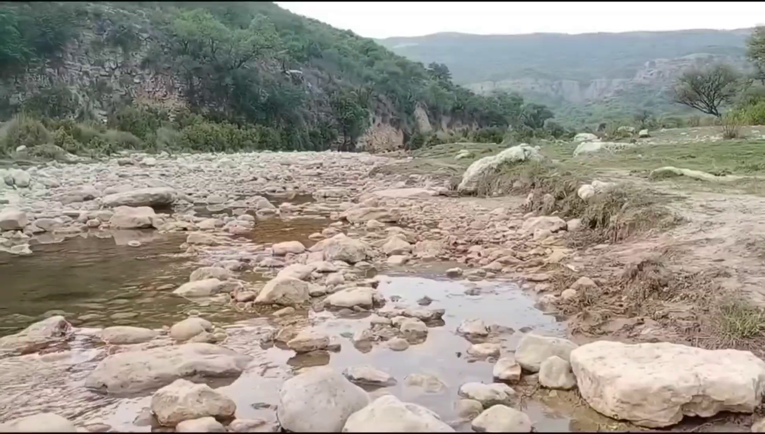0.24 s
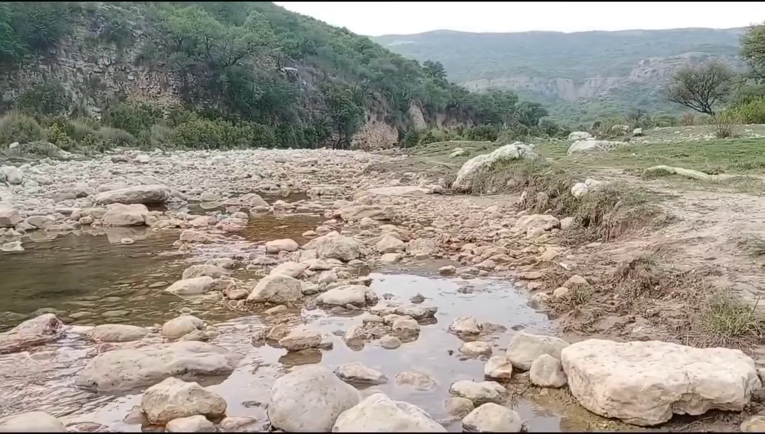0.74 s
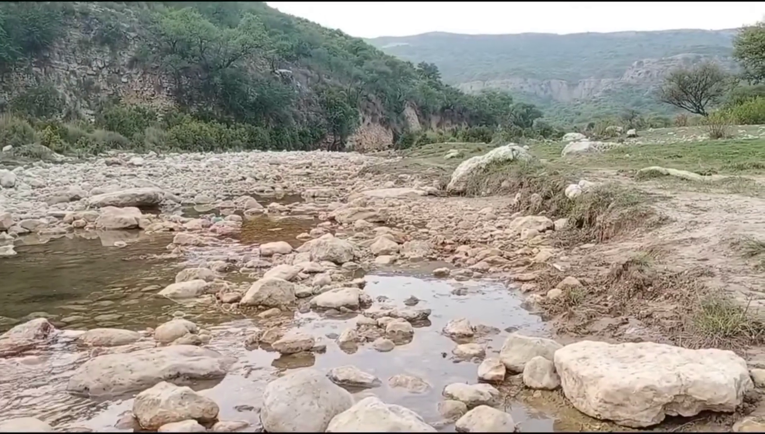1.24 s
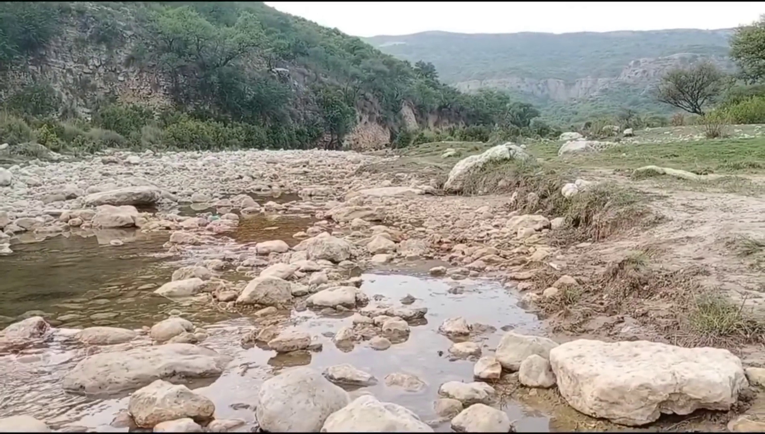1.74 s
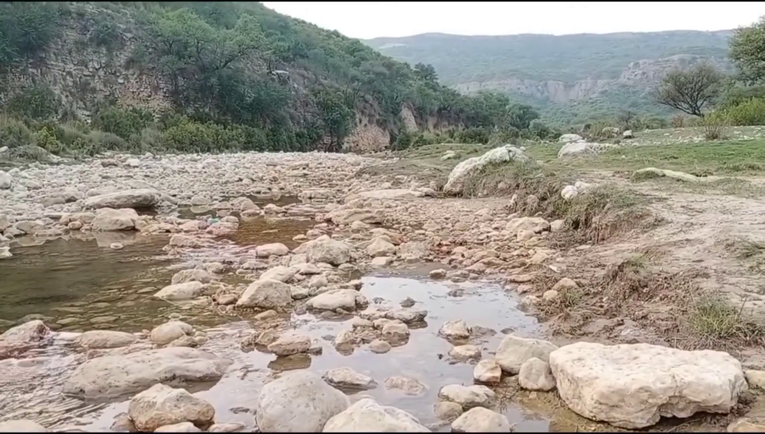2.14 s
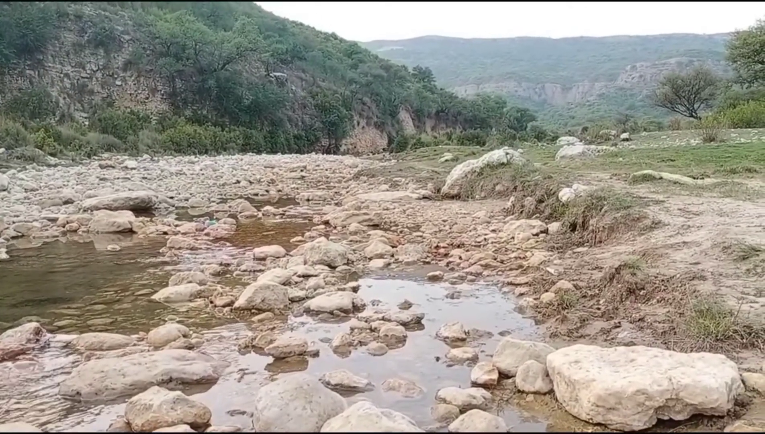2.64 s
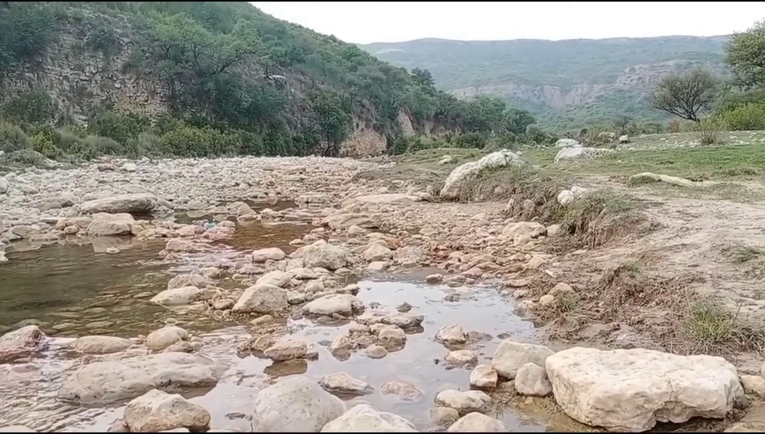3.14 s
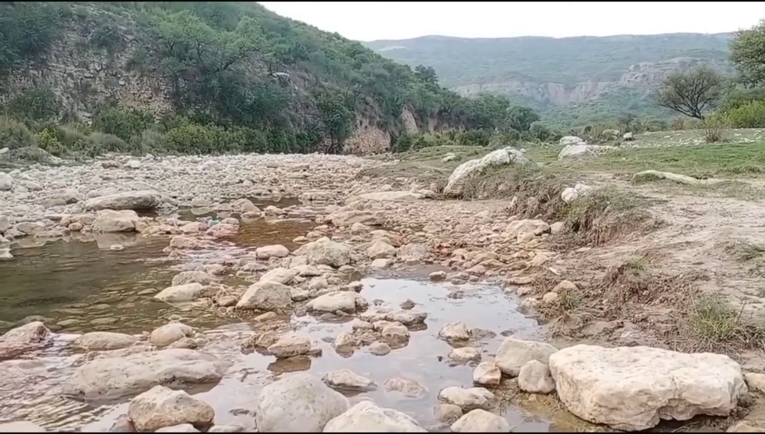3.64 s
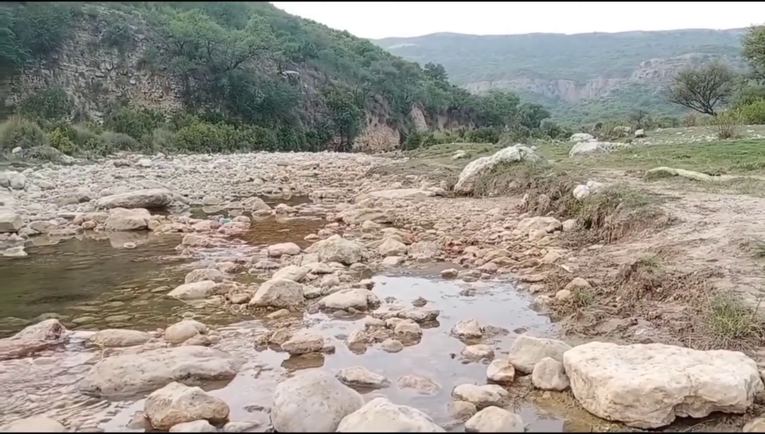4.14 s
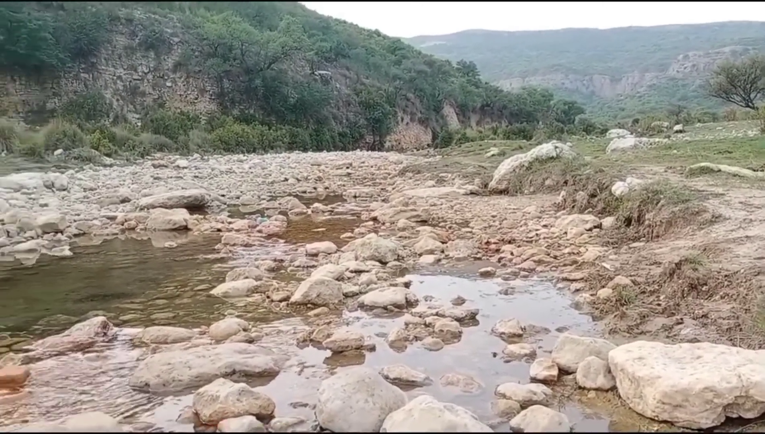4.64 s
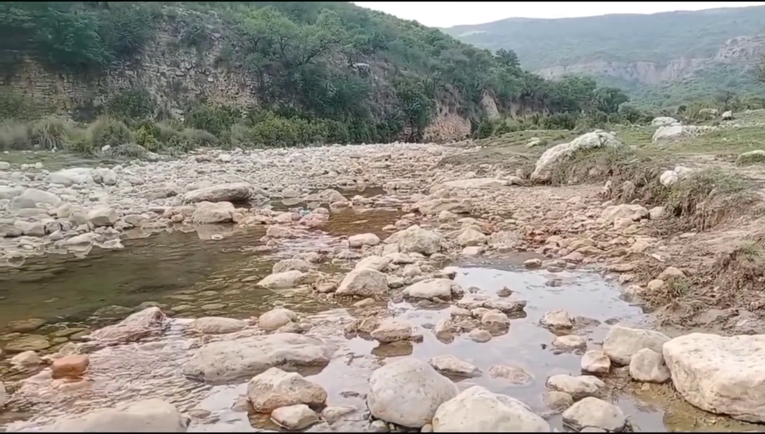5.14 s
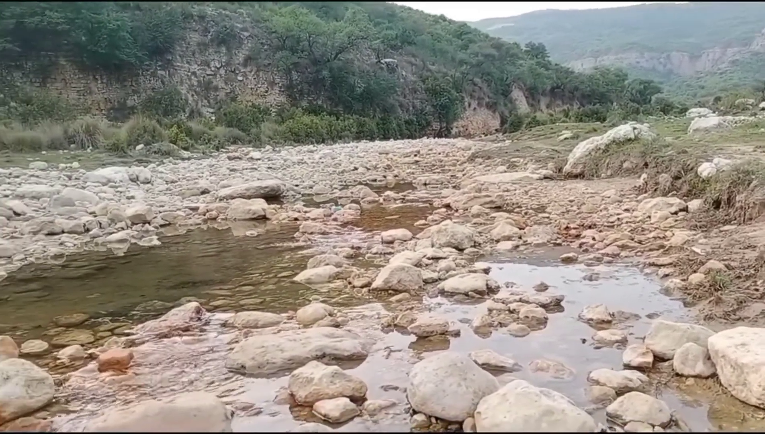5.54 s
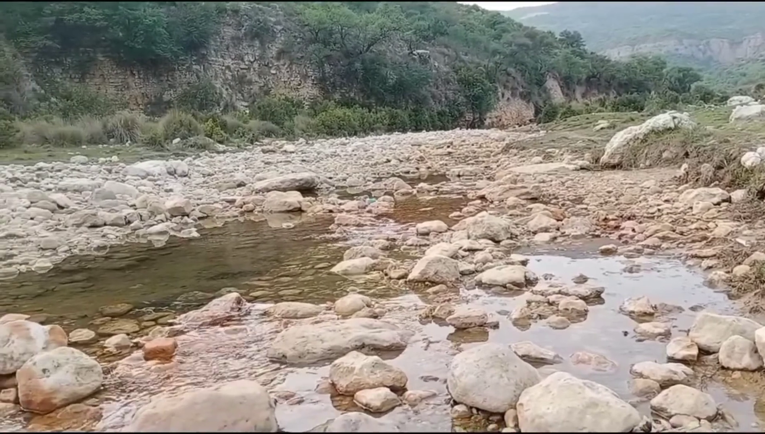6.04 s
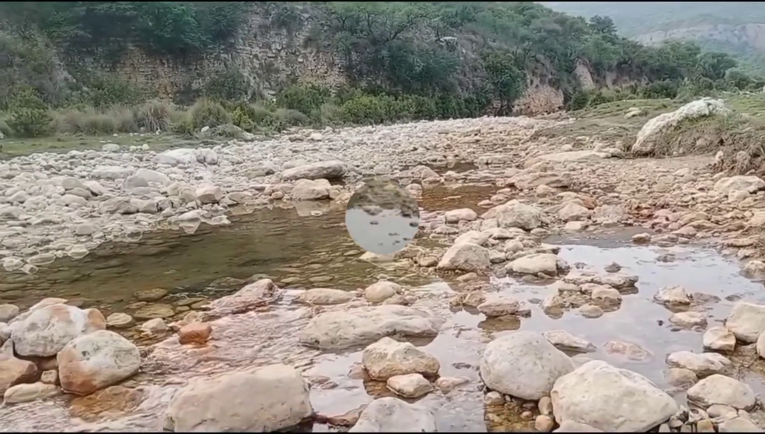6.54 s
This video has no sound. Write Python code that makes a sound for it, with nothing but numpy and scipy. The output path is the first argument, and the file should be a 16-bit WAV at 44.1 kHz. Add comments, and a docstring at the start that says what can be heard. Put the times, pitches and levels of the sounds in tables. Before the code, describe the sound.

A brief, bright rush of stream water with a short thin bird call breaks off abruptly. A quieter brook then fades in close by, gurgling over stones with ringing plops, wet slaps and, later, hollow low gulps. Faint birds whistle across an open valley. Near the end a pebble knocks, birds chirp in a quick run, wind buffets the microphone and a small motorcycle putters nearer.

```python
"""A lively burst of stream water over stones comes first, with a short thin bird call; it breaks off at 0.3 s.
Calmer water fades in: ringing gurgle, plops, splashes and hollow gulps, with small birds whistling far away.
Near the end a small motorcycle putters closer, wind buffets the microphone and a pebble knocks.
Bubbles, gulps and birds are sine tones; rushing water, wind and hiss are shaped noise; the motor is a row of puffs."""
import sys
import numpy as np
from scipy import signal
from scipy.fft import rfft, irfft, next_fast_len
from scipy.io import wavfile
from scipy.ndimage import uniform_filter1d, map_coordinates

SR = 44100
rng = np.random.default_rng(int(sys.argv[2]) if len(sys.argv) > 2 else 0)


def materialize(psi):
    """Save the field psi as 16-bit PCM at rate SR to the path in sys.argv[1].

    A 1-D psi becomes a single channel; in a 2-D psi each row is a channel.
    """
    bounded = np.clip(np.atleast_2d(psi).T, -1, 1)
    quanta = np.round(bounded * 32767).astype(np.int16)
    wavfile.write(sys.argv[1], SR, quanta)


N = 298998

# All dB values are relative: each sound's own gain and the overall level still act on them.
# A t60 is the time a sound takes to die away by 60 dB.

# Overall level around the break. Each row: time in seconds, level in dB.
OVERALL_LEVEL = [(.3035, -3.5), (.305, -20), (.335, -23), (.38, -14)]

# Flow of the lively opening riffle, then of the calmer brook.
# Each row: time in seconds, gurgle in dB, fizz in dB, spray in dB.
RIFFLE_FLOW = [(0, -56.5, -68.5, -92), (.11, -61, -66, -82), (.2, -55, -59, -82), (.3, -57.5, -62, -76)]
BROOK_FLOW = [(0.36, -73.5, -96, -100), (0.48, -65.5, -77.5, -100), (0.72, -55, -79, -88),
              (1.27, -56.5, -71, -90), (1.47, -49.5, -66, -78), (1.84, -55, -66, -83),
              (2.08, -50.5, -57.5, -67), (2.49, -57.5, -65.5, -80.5), (2.76, -57.5, -69, -75),
              (3, -52.5, -65.5, -83.5), (3.28, -58.5, -68, -87), (3.44, -47.5, -51.5, -60.5),
              (3.66, -47.5, -55, -65.5), (3.95, -55.5, -67, -78), (4.19, -57, -73.5, -86.5),
              (5.2, -57, -72, -81.5), (5.69, -51.5, -64.5, -83), (6.49, -59, -72.5, -82),
              (6.78, -55.5, -68, -99)]

# Tone colours of the water, from its ringing middle to its low murmur.
# Each row: frequency in Hz, strength per Hz in dB.
GURGLE_COLOUR = [(600, -24.5), (950, -11), (1150, -16.5), (1480, -3.5), (1700, -5.5), (2250, -1.5),
                 (3200, -2), (4400, -9), (5200, -27.5), (6500, -69)]
FIZZ_COLOUR = [(3500, -44.5), (4400, -16), (4750, -5), (5100, -11.5), (5800, 1.5), (6500, -1),
               (7200, -18.5), (7800, -14), (9000, -47)]
SPRAY_COLOUR = [(6500, -27), (8000, -7.5), (9500, -14), (11300, -9.5), (12600, -2), (15800, -3.5)]
MURMUR_COLOUR = [(30, -16.5), (75, -2), (300, -5), (700, -9), (1100, -16), (2000, -33)]

# Thin rings above the water. Each row: pitch in Hz, width in Hz, level over the gurgle in dB.
HIGH_RINGS = [(4725, 180, -11.5), (6500, 340, -11)]

# Wavelets that wash over the stones and churn in a hollow. Each row: time of the height in seconds,
# length in seconds, pitch of the hollow in Hz, churn level in dB, lift of the hiss in dB.
WAVELETS = [(0.857, 0.086, 2380, -41.5, 2.5), (1.223, .08, 2960, -41, 6), (0.978, .09, 2710, -45.5, 0),
            (1.605, 0.14, 2225, -41, 12), (1.67, .16, 748, -54, 1), (1.851, 0.16, 2205, -40.5, 10.5),
            (1.921, 0.064, 3300, -37, 12.5), (2.08, 0.18, 1950, -52, 7), (2.249, 0.1, 1435, -53, 6),
            (2.422, 0.093, 2260, -45, 4), (2.668, .12, 2130, -38, 2.5), (3.189, 0.11, 2187, -46, 13),
            (3.473, 0.34, 2360, -45, 3), (3.649, 0.16, 1696, -41.5, 2), (3.923, .13, 1923, -44.5, 8.5),
            (4.097, 0.086, 3330, -40.5, 0.5), (4.261, 0.071, 2990, -45.5, 7.5),
            (5.65, 0.17, 1427, -50, 5.5), (5.994, 0.13, 1252, -48, 10), (6.391, 0.13, 1467, -41, -0.5)]

# Wind. Each row of the first: time in seconds, level in dB; of the second: frequency in Hz, strength in dB.
WIND_LEVEL = [(0, -97), (.08, -79), (.11, -52), (.3, -57.5), (.35, -110), (5.9, -91.5), (6.35, -53.5),
              (6.54, -36), (6.78, -42)]
WIND_COLOUR = [(8, -6.0), (28, -10.0), (60, -10.5), (130, -10.5), (300, -37.5)]

# The largest bubbles. Each row: start in seconds, pitch in Hz, peak in dB.
LARGE_PLOPS = [(.119, 2754, -40.5), (.177, 1450, -41.5), (.379, 1420, -48.5), (.698, 1504, -38.5),
               (.792, 1211, -33.5), (.852, 3020, -40.5), (.9, 1506, -44.5), (1.075, 1604, -42),
               (1.282, 2950, -42.5), (1.612, 1456, -36), (1.706, 2255, -36.5), (1.708, 1510, -38),
               (2.153, 2170, -38), (2.587, 1616, -38.5), (2.6, 2535, -36), (2.703, 563, -36),
               (2.708, 1390, -32.5), (2.741, 2500, -34.5), (2.812, 2880, -40), (2.93, 1395, -44),
               (3.333, 1568, -35), (3.665, 1315, -39), (3.751, 1092, -37), (3.757, 766, -39.5),
               (4.08, 1226, -34.5), (4.233, 2380, -43.5), (4.631, 2756, -37), (4.732, 1500, -37.5),
               (4.747, 822, -49.5), (4.891, 1510, -45), (5.097, 4020, -42.5), (5.26, 406, -47),
               (5.33, 887, -45.5), (5.376, 1830, -44), (5.393, 1690, -49), (5.483, 1990, -40.5),
               (5.512, 1400, -41.5), (5.514, 635, -48), (5.654, 1424, -43.5), (5.721, 2770, -40),
               (5.755, 1555, -40.5), (6.188, 1665, -41), (6.39, 883, -48.5), (6.76, 1450, -33)]

# The first bird call. Each row: time in seconds, pitch in Hz, level in dB.
BIRD_CALL = [(.13, 3860, -63), (.185, 3790, -44), (.213, 3780, -40.5), (.25, 3944, -43),
             (.304, 3906, -44.5), (.32, 3925, -75)]

# Thin bird whistles. Each row: start in seconds, length in seconds, start pitch in Hz, end pitch in Hz,
# peak in dB, waver as a share of the pitch.
BIRD_WHISTLES = [(4.41, 0.15, 2940, 2817, -49, 0.0033), (4.838, 0.12, 3480, 3397, -43, .003),
                 (5.19, 0.17, 2910, 2948, -43.5, 0.002)]

# Slaps of water on stone. Each row: start in seconds, level in dB, hold in seconds, t60 in seconds.
SPLASHES = [(0.1786, -31.5, 0.0061, 0.014), (0.54, -49, 0.014, 0.057), (1.798, -43.5, 0.0048, 0.045),
            (2.5986, -31, 0.0086, .05), (2.7007, -17.5, 0.0079, 0.069), (2.738, -34.5, 0.0054, 0.093),
            (3.741, -26, 0.019, 0.027), (4.074, -44.5, 0.017, 0.096), (4.734, -41, 0.011, .047),
            (5.763, -45, 0.0047, 0.04), (6.127, -43.5, .004, 0.083), (6.759, -37.5, 0.006, 0.067)]
# Tone colour of a splash. Each row: frequency in Hz, strength in dB.
SPLASH_COLOUR = [(300, -10.0), (900, -10), (1350, -7.5), (3800, -5.5),
                 (4900, -8.5), (6200, -5.5), (8500, -34), (15500, -38)]
# Resonances of the gap between the stones. Each row: pitch in Hz, width in Hz, level in dB.
STONE_GAP = [(1370, 144, -1.5), (1780, 70, 1), (2420, 170, -6), (3810, 120, -2), (6280, 180, -14)]

# Runnels that sing a gliding note. Each row: time of the height in seconds, length in seconds,
# start pitch in Hz, end pitch in Hz, level in dB.
RUNNELS = [(1.811, 0.073, 1206, 1900, -43), (2.398, 0.18, 1444, 1340, -40.5),
           (4.021, 0.1, 1950, 1760, -35.5), (6.214, 0.15, 2240, 2000, -45), (6.401, 0.1, 2620, 2150, -43)]

# Hollow gulps between the stones. Each row: start in seconds, pitch in Hz, peak in dB,
# swell in seconds, t60 in seconds, gargle in dB over the gulp.
GULPS = [(1.955, 223, -58, 0.0031, 0.2, 8.5), (2.604, 259.4, -35, 0.0048, 0.26, -13.5),
         (2.704, 263, -35.5, 0.0081, 0.25, -5.5), (3.529, 258.8, -49.5, 0.037, 0.7, -42),
         (3.75, 255.2, -36, 0.008, 0.2, -3.5), (5.258, 210, -51, 0.017, 0.53, 5.5),
         (5.32, 227, -38.5, 0.0085, 0.17, -13), (5.508, 229.5, -36, 0.0093, 0.29, -6.5),
         (5.604, 229.7, -39, 0.021, 0.68, -19), (5.73, 234.2, -32, 0.034, 0.19, -5.5),
         (6.039, 262, -31, 0.026, 0.18, -37), (6.205, 262, -27.5, 0.011, 0.069, -23.5),
         (6.228, 156, -46.5, 0.0033, 0.92, -4), (6.762, 279, -33.5, 0.0055, .2, -5.5)]
# Tone colour of the gargle. Each row: frequency in Hz, strength per Hz in dB.
GARGLE_COLOUR = [(100, -11), (190, -7), (300, -2), (520, -8.5), (750, -6.5), (1200, -12.5), (2200, -17)]
# Higher resonances of the air pocket. Each row: multiple of its pitch, level in dB.
POCKET_RINGS = [(1.9, 2), (2.4, -6), (2.95, -4.5)]

# How near the motorcycle sounds. Each row: time in seconds, level in dB.
NEARNESS = [(0, -121), (5.9, -99), (6.3, -19.5), (6.5, -3), (6.66, 4), (6.78, 7)]
# Resonances of the exhaust. Each row: pitch in Hz, width in Hz, level in dB.
EXHAUST = [(113, 53, -5.5), (175, 68, 1), (254, 74, 2), (514, 290, -9), (1520, 810, -13.5)]
# Tone colour of the hiss. Each row: frequency in Hz, strength per Hz in dB.
HISS_COLOUR = [(300, 5.5), (1500, -1), (4000, -17), (7700, -2), (9300, -11), (12000, -36)]

# Ringing of a knocked pebble. Each row: pitch in Hz, level in dB, t60 in seconds.
PEBBLE_RINGS = [(2727, 15, 0.015), (2530, -11, 0.096), (3150, -9, 0.054), (1330, -9, 0.074),
                (1127, -12.5, 0.089)]

GURGLE_GROWS, SPRAY_GROWS = 0.57, 0.92  # lift of gurgle and spray, dB per dB of hiss lift
RILLS_DB, BUBBLES_DB, RUSH_DB = -3, -1, 0  # parts of the gurgle
RUSH_GROWS = 0.22  # fast water rushes more than it sings: extra dB per dB of gurgle
MURMUR_DB, MURMUR_FOLLOWS = -67, 0.4  # level at the mean gurgle, dB per dB of gurgle
SCATTER_DB, SCATTER_FOLLOWS = 5, 0.78  # chance events: spread of level either way, dB per dB of gurgle
EDDIES_PER_S, EDDY_S, EDDY_DB = 4, 0.11, 0  # smaller churnings: rate, length, level over the gurgle
EDDY_HZ, CHURN_DRIFT = (2300, 4210), 0.0404  # range of pitch; typical drift of any hollow, as a share
SMALL_PLOPS_PER_S, SMALL_PLOP_HZ, SMALL_PLOP_DB = 3, (2090, 4160), 8.5  # rate, pitches, level over the gurgle
CHIRP_START_S, CHIRP_EVERY_S, CHIRP_S = 6.338, 0.0888, 0.0393  # the even run of chirps: start, spacing, length
CHIRP_FROM_HZ, CHIRP_TO_HZ, CHIRP_DB = 2876, 2600, -32.5  # fall of pitch, peak level
CHIRP_WAVER = 0.0099  # unsteadiness, as a share of the pitch
TOP_HZ = 15750


def amp(db):
    """Turn decibels into a gain."""
    return 10 ** (np.asarray(db) / 20)


def unit(x):
    """Scale to an average strength (rms) of 1."""
    return x / np.sqrt(np.mean(x ** 2) + 1e-20)


def curves(rows):
    """Draw straight lines between rows: one value per sample for each column after the time."""
    s, *cols = np.transpose(rows)
    return [np.interp(np.arange(N) / SR, s, c) for c in cols]


def wobble(rate):
    """A smooth random curve with rate knots a second."""
    return map_coordinates(rng.standard_normal(4096), [np.arange(N) * rate / SR], mode="wrap")


def filtered(x, response):
    """Multiply the spectrum of x by a response that depends on frequency."""
    m = next_fast_len(N + SR // 2)
    return irfft(rfft(x, m) * response(np.fft.rfftfreq(m, 1 / SR)), m)[..., :N]


def coloured(x, points):
    """Shape x by (Hz, dB) points on a log pitch axis, then scale to rms 1."""
    f, db = np.transpose(points)

    def gain(hz):
        return amp(np.interp(np.log(hz + 1), np.log(f), db, left=-120, right=-120))

    return unit(filtered(x, gain))


def resonances(modes):
    """The response of a body with (Hz, width Hz, dB) resonances; neighbours have opposite signs."""
    def response(f):
        total = 0
        for k, (centre, width, db) in enumerate(modes):
            damping = 1j * f * width
            total = total + (-1) ** k * amp(db) * damping / (centre * centre - f * f + damping)
        return total

    return response


def add(track, s, sound):
    """Mix a sound into the track at a time in seconds."""
    start = max(0, round(s * SR))
    part = track[start:start + len(sound)]
    part += sound[:len(part)]


def swarm(starts, tones):
    """Sum many short tones, each at its start given as a share of the whole length, at rms 1."""
    at = (starts * N).astype(int) + np.arange(tones.shape[1])
    return unit(np.bincount(at.ravel(), tones.ravel(), N)[:N])


def rush(points, patchy_db):
    """Noise of rms 1 with narrow patches of gain that last about a tenth of a second."""
    z = signal.stft(rng.standard_normal(N), nperseg=1024)[2]
    field = uniform_filter1d(rng.standard_normal(z.shape), size=5, axis=0)
    field = uniform_filter1d(field, size=11, axis=1)
    noise = signal.istft(z * amp(patchy_db * unit(field)), nperseg=1024)[1][:N]
    return coloured(noise, points)


def burble(hz, width_hz, size):
    """A crowd of like-sized bubbles: a narrow band of noise around one steady or gliding pitch."""
    t = np.arange(size) / SR
    knots = rng.standard_normal((2, int(t[-1] * width_hz) + 4))
    a, b = (map_coordinates(k, [t * width_hz]) for k in knots)
    turn = 2 * np.pi * np.cumsum(hz * np.ones(size)) / SR
    return a * np.sin(turn) + b * np.cos(turn)


def flow():
    """Levels of gurgle, fizz and spray in dB: first the riffle, then the brook; wavelets lift the hiss."""
    in_riffle = np.arange(N) / SR < OVERALL_LEVEL[1][0]
    gurgle_db, fizz_db, spray_db = np.where(in_riffle, curves(RIFFLE_FLOW), curves(BROOK_FLOW))
    lift_db = np.zeros(N)
    for s, length, _, _, db in WAVELETS:
        add(lift_db, s - length / 2, db * np.hanning(int(length * SR)))
    return gurgle_db + GURGLE_GROWS * lift_db, fizz_db + lift_db, spray_db + SPRAY_GROWS * lift_db


def scattered(count, pitch_range, over_db):
    """Chance events as rows (s, Hz, dB), spread loosely over time and stronger where the water runs faster."""
    u, gurgle_db = rng.random((count, 3)), flow()[0]
    at = ((np.arange(count) + u[:, 0]) * N / count).astype(int)
    low, high = pitch_range
    hz = low * (high / low) ** u[:, 1]
    around_db = gurgle_db.mean() + SCATTER_FOLLOWS * (gurgle_db[at] - gurgle_db.mean())
    return list(zip(at / SR, hz, around_db + over_db + SCATTER_DB * (2 * u[:, 2] - 1)))


def rills(count, low_hz, high_hz, life, spread_db, bend):
    """Water sliding over stones sings in short soft tones that bend as their hollows change size."""
    u, chance = rng.random((count, 3)), rng.standard_normal((count, 2))
    t = np.arange(SR // 10) / SR
    hz = low_hz * (high_hz / low_hz) ** u[:, 1:2]
    age = np.minimum(t / (life * (.5 + u[:, 2:3])), 1)
    size = amp(spread_db * np.clip(chance[:, :1], -2, 2))
    shape = np.sin(np.pi * np.sqrt(age)) ** 2
    tones = size * shape * np.sin(2 * np.pi * hz * t * (1 + bend * chance[:, 1:] * t))
    return swarm(u[:, :1], tones)


def bubbles(count, low_hz, high_hz, cycles, spread_db, glide):
    """A swarm of short damped bubble tones of random pitch and size."""
    u = rng.random((count, 4))
    t = np.arange(SR // 50) / SR
    hz = low_hz * (high_hz / low_hz) ** u[:, 1:2]
    age = hz * t / (cycles * (.5 + u[:, 2:3]))
    size = amp(-spread_db * np.log(np.maximum(u[:, 3:], .02)))  # a few bubbles are much louder
    shape = np.exp(-age) * (1 - np.exp(-4 * age)) * (1 - t / t[-1])
    tones = size * shape * np.sin(2 * np.pi * hz * t * (1 + glide * t))
    return swarm(u[:, :1], tones)


def stream():
    """Singing rills and bubbles ride on rushing water; spray and droplets hiss above and a murmur lies below."""
    gurgle_db, fizz_db, spray_db = flow()
    faster_db = gurgle_db - gurgle_db.mean()
    lapping, flutter = wobble(17), .9 * wobble(45)

    tones = coloured(rills(count=750, low_hz=1150, high_hz=5000, life=.04, spread_db=4, bend=.25), GURGLE_COLOUR)
    large = bubbles(count=900, low_hz=1100, high_hz=5000, cycles=16, spread_db=2.5, glide=-1)
    small = bubbles(count=3500, low_hz=4300, high_hz=9000, cycles=22, spread_db=2.8, glide=0)
    droplets = bubbles(count=500, low_hz=6000, high_hz=15000, cycles=2, spread_db=6, glide=0)

    gurgle = amp(RILLS_DB) * tones + amp(BUBBLES_DB) * coloured(large, GURGLE_COLOUR)
    gurgle += amp(RUSH_DB + RUSH_GROWS * faster_db) * rush(GURGLE_COLOUR, patchy_db=4)
    gurgle *= amp(gurgle_db + 1.7 * lapping)

    fizz = .7 * coloured(small, FIZZ_COLOUR) + .8 * rush(FIZZ_COLOUR, patchy_db=3.5)
    fizz *= amp(fizz_db + 2 * lapping + 1.6 * flutter)

    spray = rush(SPRAY_COLOUR, patchy_db=.5) + .4 * coloured(droplets, SPRAY_COLOUR)
    spray *= amp(spray_db + 2.2 * lapping + 2.2 * flutter + 1.5 * wobble(150))

    murmur = amp(MURMUR_DB + MURMUR_FOLLOWS * faster_db) * rush(MURMUR_COLOUR, patchy_db=1.0)

    # thin high rings come and go; they stop growing when the gurgle passes its mean
    ring = sum(amp(db + 3 * wobble(16) - 1) * burble(hz, width, N) for hz, width, db in HIGH_RINGS)
    ring = amp(np.minimum(gurgle_db, gurgle_db.mean())) * ring
    return amp(2.5) * gurgle + amp(9.0) * fizz + amp(9.5) * spray + murmur + ring


def churning():
    """Hollows fill and empty under wavelets and eddies; each churns in uneven spurts around a drifting pitch."""
    out = np.zeros(N)
    chance = scattered(round(EDDIES_PER_S * N / SR), EDDY_HZ, EDDY_DB)
    eddies = [(s, EDDY_S, hz, db) for s, hz, db in chance]
    for s, length, hz, db, *_ in list(WAVELETS) + eddies:
        shape = np.hanning(int(length * SR))
        pitch = hz * (1 + CHURN_DRIFT * rng.standard_normal() * np.linspace(-1, 1, len(shape)))
        crowd = burble(pitch, hz / 16, len(shape)) + .6 * burble(pitch, hz / 3, len(shape))
        add(out, s - length / 2, amp(db) * shape * crowd)
    spurts = amp(3 * wobble(60) - 1)
    return out * spurts


def wind():
    """Light puffs of low noise buffet the microphone, mostly on the left."""
    buffet = np.array([rush(WIND_COLOUR, patchy_db=4.0) for _ in range(2)])
    left_right_db = [[0], [-10]]
    return amp(curves(WIND_LEVEL)[0]) * amp(left_right_db) * buffet


def plops(rise_cycles=4.6, t60=0.045, glide=-1.51, linger_db=-16, froth_db=-15):
    """Each bubble swells for a few cycles, sags in pitch and leaves a faint rough ring among the stones."""
    out, t = np.zeros(N), np.arange(SR // 10) / SR
    small = scattered(round(SMALL_PLOPS_PER_S * N / SR), SMALL_PLOP_HZ, SMALL_PLOP_DB)
    for s, hz, db in list(LARGE_PLOPS) + small:
        onset = 1 - np.exp(-(t * hz / rise_cycles) ** 2)
        shape = onset * amp(-60 * t / t60)
        tone = shape / shape.max() * np.sin(2 * np.pi * hz * t * (1 + glide * t))
        linger = amp(linger_db - 60 * t / 0.2) * burble(hz, hz / 10, len(t))
        froth = amp(froth_db - 60 * t / 0.065) * burble(1.3 * hz, 0.62 * hz, len(t))
        add(out, s, amp(db + 10.0) * (tone + onset * (linger + froth)))
    return out


def birds(count=5):
    """A short call, thin wavering whistles, then a run of falling chirps; the valley blurs all but the call."""
    whistles = np.zeros(N)
    chirps = [(CHIRP_START_S + k * CHIRP_EVERY_S, CHIRP_S, CHIRP_FROM_HZ, CHIRP_TO_HZ, CHIRP_DB, CHIRP_WAVER)
              for k in range(count)]
    for s, length, start_hz, end_hz, db, unsteady in list(BIRD_WHISTLES) + chirps:
        u = np.linspace(0, 1, int(length * SR))
        waver = map_coordinates(rng.standard_normal(16), [u * length * 55])
        hz = (start_hz + (end_hz - start_hz) * u) * (1 + unsteady * waver)
        add(whistles, s, amp(db) * np.sin(np.pi * u) * np.sin(2 * np.pi * np.cumsum(hz) / SR))

    call_hz, call_db = curves(BIRD_CALL)
    time = np.arange(N) / SR
    singing = (time > BIRD_CALL[0][0]) & (time < BIRD_CALL[-1][0])
    call = singing * amp(call_db) * np.sqrt(2) * np.sin(2 * np.pi * np.cumsum(call_hz) / SR)

    # a fading burst of noise smears the whistles into an echo
    t = np.arange(SR // 4) / SR
    tail = rng.standard_normal(len(t)) * amp(-60 * t / 0.21)
    echo = signal.fftconvolve(whistles, tail / np.linalg.norm(tail))[:N]
    return (whistles + call) * amp(1.2 * wobble(120)) + amp(-10) * echo


def splashes(direct_db=-3, gap_db=-3):
    """A slap is a dense burst of droplets that holds briefly, dies and rings the gap between the stones."""
    level, t = np.zeros(N), np.arange(SR // 5) / SR
    for s, db, hold, t60 in SPLASHES:
        decay = amp(db - 60 * np.maximum(t - hold, 0) / t60)
        add(level, s, decay * (1 - np.exp(-t / 0.000089)))
    droplets = amp(2.5 * wobble(400) - 1)
    burst = level * droplets * rush(SPLASH_COLOUR, patchy_db=2.5)
    gap_ring = burst.std() * unit(filtered(burst, resonances(STONE_GAP)))
    return amp(direct_db) * burst + amp(gap_db) * gap_ring


def runnels(width_hz=70, clean=0.53):
    """A thread of water fills or drains a hollow, whose half-rough note glides."""
    out = np.zeros(N)
    for s, length, start_hz, end_hz, db in RUNNELS:
        hz = np.linspace(start_hz, end_hz, int(length * SR))
        pure = np.sin(2 * np.pi * np.cumsum(hz) / SR)
        note = clean * pure + (1 - clean) * burble(hz, width_hz, len(hz))
        add(out, s - length / 2, amp(db) * np.hanning(len(hz)) * note)
    return out


def gulps(ring_db=-1, churn_db=-1):
    """A trapped pocket of air booms unsteadily; water gargles around it and stirs its higher resonances."""
    boom, gargle, ring = np.zeros(N), np.zeros(N), np.zeros(N)
    t = np.arange(SR // 2) / SR
    for s, hz, db, swell, t60, gargle_db in GULPS:
        age = np.maximum(t - swell, 0)
        shape = amp(db - 60 * age / t60) * np.sin(np.pi / 2 * np.minimum(t / swell, 1)) ** 2
        rough = np.minimum(t / .15, .55)  # the tone starts pure and turns rough
        tone = (1 - rough) * np.sin(2 * np.pi * hz * t) + rough * burble(hz, hz / 2, len(t))
        add(boom, s, shape * tone)
        stir = shape * amp(gargle_db - 72 * age)  # the gargle dies faster than the boom
        add(gargle, s, stir)
        add(ring, s, stir * sum(amp(level) * burble(k * hz, 70, len(t)) for k, level in POCKET_RINGS))
    churn = amp(3.5 * wobble(70) - 1) * rush(GARGLE_COLOUR, patchy_db=4)
    return amp(8.0) * boom + amp(ring_db) * ring + amp(churn_db) * gargle * churn


def motorcycle(firing_hz=20.0):
    """One cylinder fires slowly through the exhaust; an airy hiss on both sides rises with it."""
    near = amp(curves(NEARNESS)[0])
    firings, t = np.zeros(N), np.arange(SR // 25) / SR
    for s in 6.726 - np.arange(-1, 12) / firing_hz:
        # a sharp push, then a rough breath of noise
        puff = np.exp(-t / 0.00028) + 0.38 * rng.standard_normal(len(t)) * np.exp(-t / 0.031)
        add(firings, s, amp(rng.normal(0, 0.55)) * puff)
    putter = amp(-58.0) * unit(filtered(firings, resonances(EXHAUST)))
    hiss = amp(-54.0) * np.array([rush(HISS_COLOUR, patchy_db=1) for _ in range(2)])
    return near * (putter + hiss)


def pebble():
    """One stone clacks and grates against another: a few damped tones with a rough, fast-changing level."""
    out, t = np.zeros(N), np.arange(SR // 10) / SR
    ring = sum(amp(db - 60 * t / t60) * np.sin(2 * np.pi * hz * t) for hz, db, t60 in PEBBLE_RINGS)
    onset = 1 - np.exp(-(t / 0.00063) ** 2)
    grating = amp(1.7 * wobble(500)[:len(t)])
    add(out, 6.12, amp(-15.5) * ring * onset * grating)
    return out


def scene():
    """Water and birds lie straight ahead; the level of everything drops sharply at the break, then partly recovers."""
    water = stream() + churning() + plops() + splashes() + runnels() + gulps() + pebble()
    return amp(curves(OVERALL_LEVEL)[0]) * (water + wind() + birds() + motorcycle())


def record(dry):
    """Remove everything at and above the band limit."""
    return filtered(dry, lambda hz: hz < TOP_HZ)


dry = scene()
out = record(dry)
materialize(out)
```